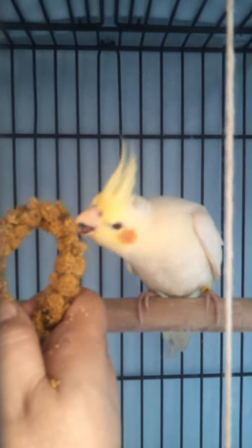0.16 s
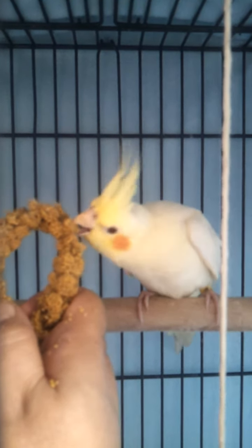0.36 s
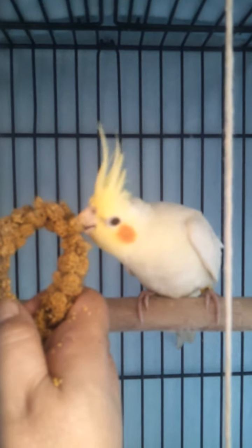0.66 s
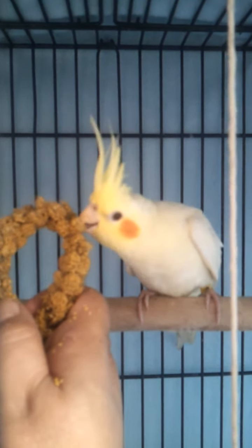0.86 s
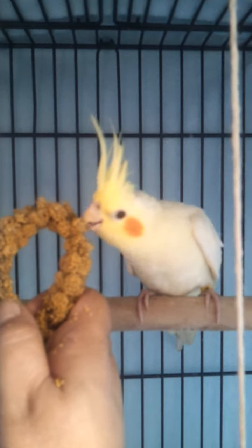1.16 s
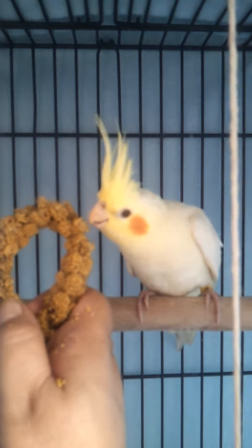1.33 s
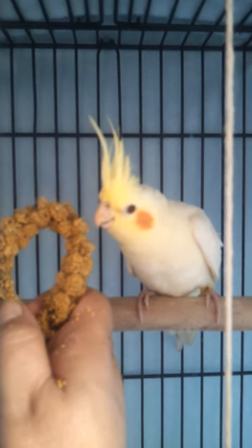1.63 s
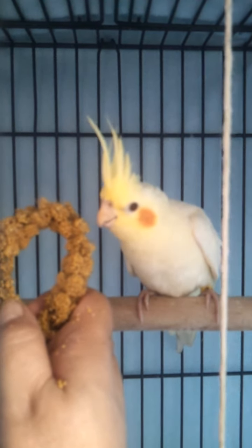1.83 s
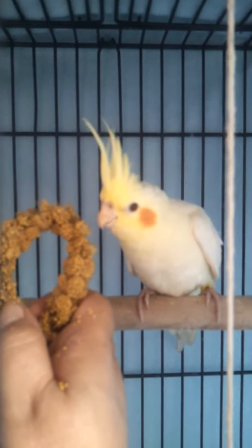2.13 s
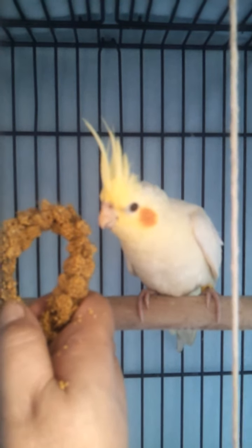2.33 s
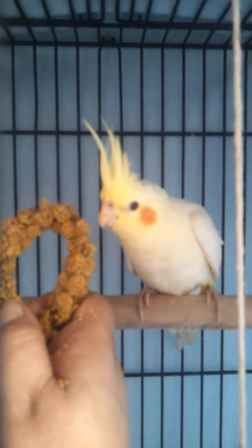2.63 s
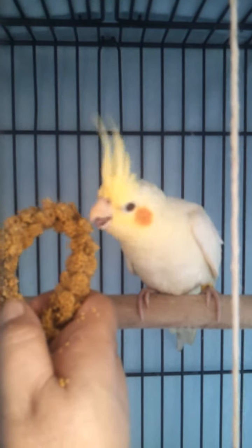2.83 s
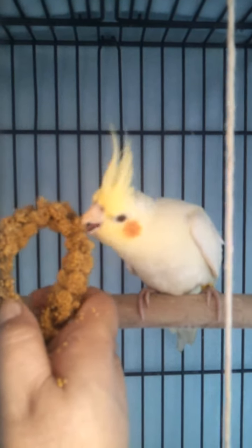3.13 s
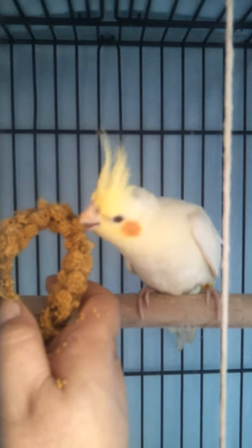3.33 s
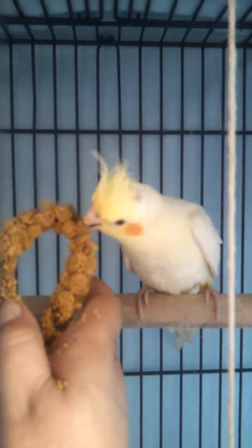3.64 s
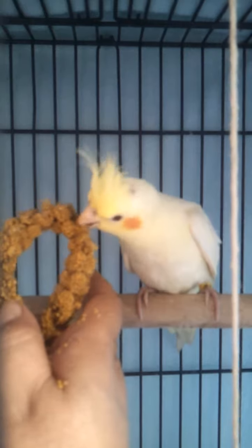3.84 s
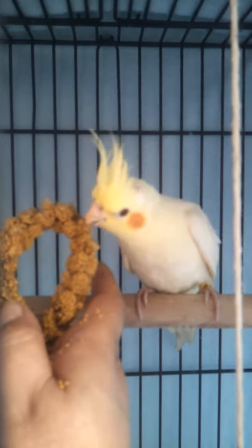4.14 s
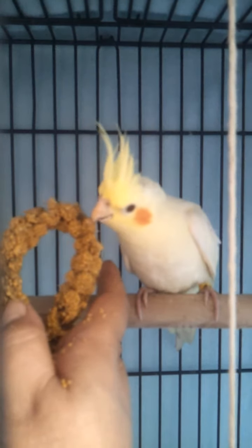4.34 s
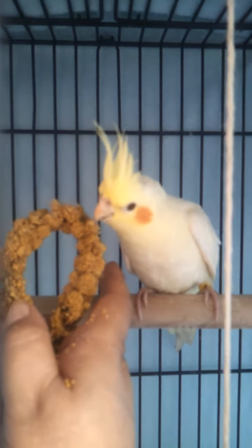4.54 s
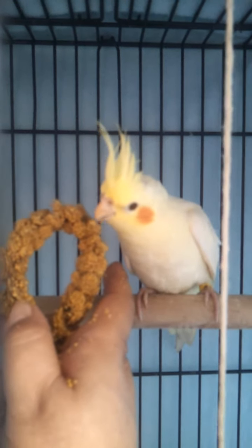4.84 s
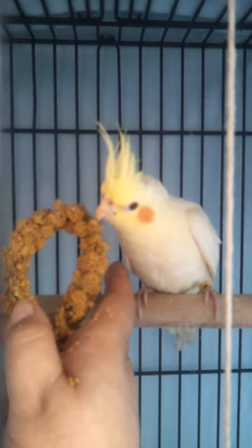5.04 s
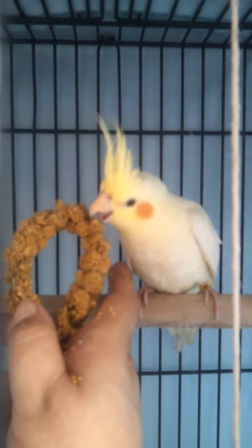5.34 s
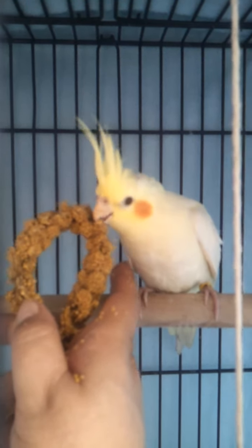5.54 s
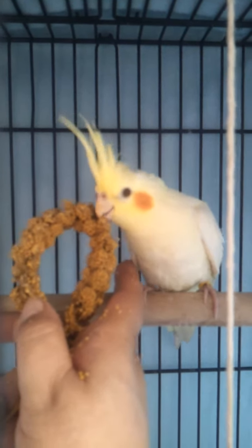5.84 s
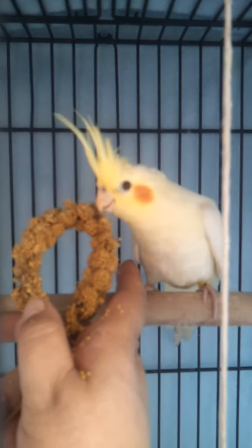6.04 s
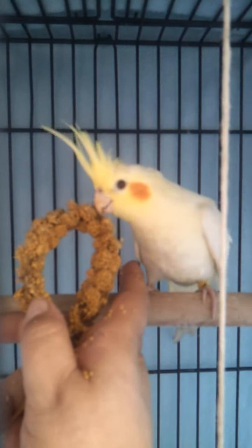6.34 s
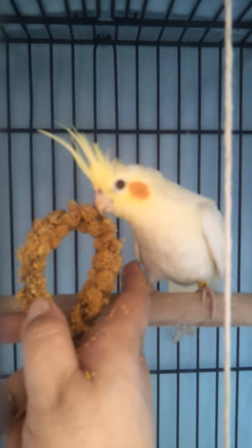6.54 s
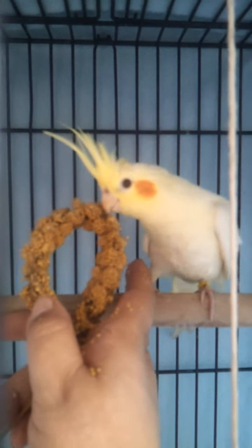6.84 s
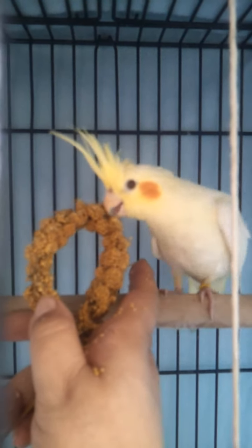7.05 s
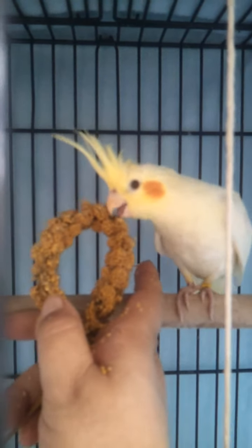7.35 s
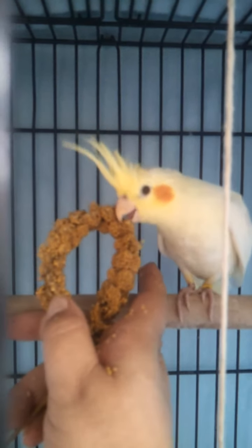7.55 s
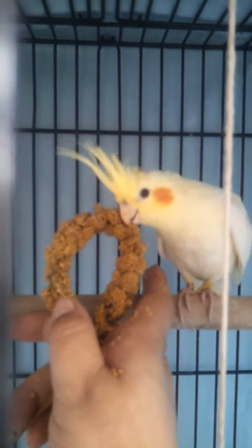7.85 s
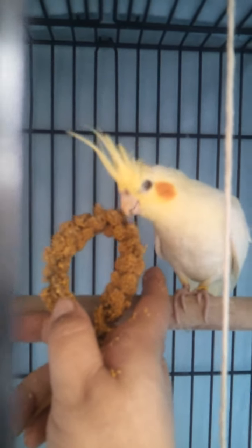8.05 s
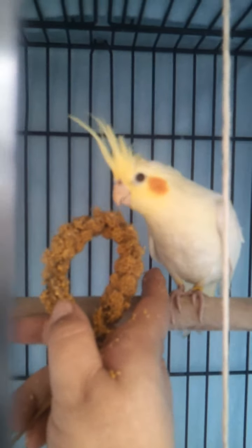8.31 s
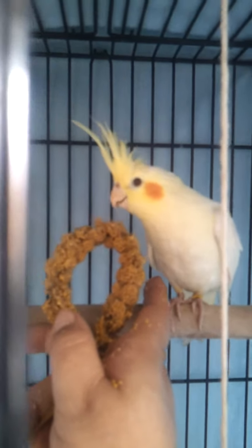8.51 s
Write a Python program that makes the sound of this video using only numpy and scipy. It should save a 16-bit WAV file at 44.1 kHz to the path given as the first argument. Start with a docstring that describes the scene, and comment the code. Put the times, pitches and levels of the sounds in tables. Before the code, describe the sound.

In a quiet small room, close to a phone microphone, a cockatiel nibbles a dry millet spray. Tiny beak ticks and crisp husk cracks come irregularly over soft hiss and low room rumble, with brief papery rustles. A barely audible squeak slips by, seeds click on the cage floor, one of them loud, claws scratch a wire, and a knock sets the cage rattling and ringing at the end.

```python
"""A cockatiel nibbles a hand-held millet spray in a wire cage, close to a phone in a quiet room.
Filtered noise makes the still air, soft rubs and rustling spray; beak touches and husk cracks are pulses
ringing broad resonances. A gliding sine squeaks faintly, then seeds drop on the cage floor as duller or
sharper clicks. Near the end claws scratch a wire, then a knock sets frame and wires ringing as decaying modes.
Decaying noise echoes each click; the phone's processing leaves a soft low rumble after sharp clicks."""
import sys
import numpy as np
from scipy import signal
from scipy.fft import rfft, irfft, next_fast_len
from scipy.io import wavfile

SR = 44100
rng = np.random.default_rng(int(sys.argv[2]) if len(sys.argv) > 2 else 0)


def int16_out(signal):
    """Quantize to a 16-bit WAV file."""
    q = np.round(np.clip(np.atleast_2d(signal).T, -1, 1) * 32767)
    wavfile.write(sys.argv[1], SR, q.astype(np.int16))


N = 382788
TIME = np.arange(N) / SR  # s

# Resonances of a hard contact on the cage: tray or wire, seed or claw, tick.
# Each row: low edge in Hz, high edge in Hz.
CONTACT_BANDS_HZ = [(1950, 4400), (5500, 7800), (8800, 14500)]


def amp(db):
    """Decibels to gain."""
    return 10 ** (np.asarray(db) / 20)


def unit(x):
    """Scale to rms 1."""
    return x / np.sqrt(np.mean(x ** 2))


def sides(pan_db):
    """Left and right gain for a level difference, left minus right."""
    gains = amp(np.array([[pan_db], [-pan_db]]) / 2)
    return unit(gains)


def band(x, low_hz, high_hz, order=2):
    """Causal Butterworth band-pass."""
    sos = signal.butter(order, [low_hz, high_hz], "bandpass", fs=SR, output="sos")
    return signal.sosfilt(sos, x)


def colour(x, points):
    """Shape a spectrum by (Hz, dB) points, joined over log frequency, at rms 1."""
    hz, db = np.transpose(points)
    length = x.shape[-1]
    size = next_fast_len(length)
    bins_hz = np.maximum(np.arange(size // 2 + 1) * SR / size, 1)
    gain = amp(np.interp(np.log(bins_hz), np.log(hz), db))
    shaped = irfft(rfft(x, size) * gain, size)
    return unit(shaped[..., :length])


def fade(t, t60_s):
    """Exponential decay, 60 dB down at t60_s."""
    return np.exp(-np.log(1000) * t / t60_s)


def add(out, start_s, sound):
    """Mix a sound in at a time."""
    i = max(int(start_s * SR), 0)
    out[..., i:i + sound.shape[-1]] += sound[..., :max(N - i, 0)]


def tilted(bands_hz, parts_db, brightness):
    """Part levels of a click: a sharper contact tilts them toward the treble, in dB per octave."""
    octaves = np.log2(bands_hz).mean(axis=1)
    return np.array(parts_db) + brightness * (octaves - octaves.mean())


def click(bands_hz, levels_db, pan_db, lag_s, split_t60_s, split_db, scatter_t60_s, scatter_db):
    """One snap: a pulse and brief splintering ring broad resonances; bars and perch scatter it."""
    t = TIME[:2048]
    pulse = unit(1. * (t == 0))
    splinters = rng.standard_normal(len(t)) * fade(t, split_t60_s)
    scatter = rng.standard_normal((2, len(t))) * fade(t, scatter_t60_s) * (1 - fade(t, 0.0071))
    push = pulse + amp(split_db) * unit(splinters) + amp(scatter_db) * unit(scatter)
    snap = np.zeros((2, len(t)))
    for k, ((low_hz, high_hz), db) in enumerate(zip(bands_hz, levels_db)):
        # alternate signs, so the skirts of neighbouring resonances join without a gap
        snap += (-1) ** k * amp(db) * unit(band(push, low_hz, high_hz))
    snap *= np.sqrt(0.005 / t[-1])  # levels_db: rms if the energy filled 5 ms
    # lag_s > 0 delays the left port, < 0 the right
    delays = [max(round(s * SR), 0) for s in (lag_s, -lag_s)]
    ports = np.array([np.roll(port, delay) for port, delay in zip(snap, delays)])
    return sides(pan_db) * ports


def ring(modes, t, port_spread_rad):
    """Decaying modes (Hz, dB, t60 in s), each reaching the two ports in its own phase."""
    out = np.zeros((2, len(t)))
    for hz, db, t60_s in modes:
        port_phase = port_spread_rad * rng.standard_normal((2, 1))
        tone = np.sin(2 * np.pi * (hz * t + rng.random()) + port_phase)
        out += amp(db) * np.sqrt(2) * fade(t, t60_s) * tone
    return out


def air(level_db=-53.5, hum_db=-75, hum_hz=113):
    """Steady hiss, and a low room rumble that is stronger on the left, with a faint hum."""
    # Still room. Each row: frequency in Hz, relative density in dB per Hz.
    air_points = [(12, -38), (20, -4.5), (55, -3), (113, -1.5), (293, -5.5), (357, -5.5), (388, -6),
                  (678, -9.5), (802, -10.5), (1440, -13), (2020, -14.5), (2910, -15.5), (3530, -15.5),
                  (14700, -20), (16000, -26)]
    noise = colour(rng.standard_normal((2, N)) + 0.24 * rng.standard_normal(N), air_points)
    low = signal.sosfiltfilt(signal.butter(2, 320, fs=SR, output="sos"), noise)
    hum = amp(hum_db) * np.sqrt(2) * np.sin(2 * np.pi * hum_hz * TIME)
    return amp(level_db) * (noise - low + sides(4.3) * low) + hum


def rubs(rise_share=0.16):
    """Soft rubs and shudders: noise in one resonance swells quickly and dies away."""
    # Rubs around the cage. Each row: start in seconds, length in seconds, centre in Hz,
    # width in Hz, level at the peak in dB.
    rub_rows = [(0, 0.084, 6090, 2200, -54.5), (0, 0.11, 2650, 340, -62), (0.459, 0.2, 377, 490, -52.5),
                (0.701, 1.12, 72, 31.7, -64), (6.99, 0.19, 131.6, 18, -53), (7.011, .13, 514, 72, -53),
                (7.24, 0.17, 137.5, 18, -54), (8.072, .12, 450, 1040, -52)]
    out = np.zeros((2, N))
    for start_s, length_s, hz, width_hz, db in rub_rows:
        noise = rng.standard_normal((2, 2 * SR)) + rng.standard_normal(2 * SR)
        low_hz = np.hypot(hz, width_hz / 2) - width_hz / 2
        progress = TIME[:int(length_s * SR)] / length_s
        swell = np.interp(progress, [0, rise_share, 1], [0, 1, 0]) ** 0.67
        settled = band(noise, low_hz, low_hz + width_hz)[:, -len(swell):]
        add(out, start_s, amp(db) * unit(settled) * swell)
    return out


def tugging(rise_share=0.48, held_db=-64):
    """Rustle strength: every tug swells and dies away over the faint stir of the held spray."""
    # Tugs at the spray. Each row: peak time in seconds, length in seconds, level at the peak in dB.
    tugs = [(.02, .1, -60), (.38, 0.15, -53), (0.683, 0.086, -54), (.89, 0.083, -57), (1.067, 0.072, -60.5),
            (2.887, 0.11, -57), (3.14, 0.047, -46), (3.32, .14, -58.5), (3.526, 0.19, -54.5),
            (3.773, .12, -54), (4.0, .25, -58), (5.475, 0.1, -56.5), (5.704, 0.14, -59), (7.36, .25, -56),
            (7.633, 0.26, -54)]
    power = amp(held_db) ** 2
    for peak_s, length_s, db in tugs:
        reach_s = length_s * np.where(TIME < peak_s, rise_share, 1 - rise_share)
        power = power + amp(db) ** 2 * np.exp(-((TIME - peak_s) / reach_s) ** 2)
    return np.sqrt(power)


def spray(spread_db=4.5, grains_per_s=3500, pan_db=-1.5):
    """Dense tiny husk grains, a few of them standing out."""
    # Colour of dry husks. Each row: frequency in Hz, level in dB.
    husk_points = [(800, -32), (2500, -13), (5000, -0.5), (7600, 2.5), (10500, 0.5), (15000, -5)]
    hit = rng.random(N) < grains_per_s / SR
    size = amp(spread_db * np.minimum(rng.exponential(size=N), 3))
    grains = colour(hit * size * rng.standard_normal((2, N)), husk_points)
    return grains * sides(pan_db) * tugging()


def beak(touch_parts_db=(-20.3, -11.3, -3.3, -5.3), average_crack_db=-47):
    """Light touches are mostly snap and tick, with little hollow beak; husks crack, earlier on the right."""
    # Light touches on the spray. Each row: start in seconds, level in dB.
    touches = [(0.1124, -48.5), (0.1862, -51), (0.3275, -45.5), (0.3888, -48), (0.651, -47.7), (2.363, -49),
               (2.6843, -50), (3.0037, -50), (3.1232, -51), (3.308, -47.5), (3.566, -53), (3.9573, -49),
               (3.982, -49)]
    # Husks cracking. Each row: start in seconds, level in dB, brightness in dB per octave.
    husk_cracks = [(0.919, -52, -2.3), (1.3879, -37, -1), (1.4916, -56.5, -1.5), (1.823, -53.5, -2.5),
                   (2.0723, -41.5, -2), (3.3653, -51, 2.5), (3.8113, -51, 4), (4.0974, -55, -0.5),
                   (4.184, -57, -3.5), (4.4621, -31, -0.5), (4.9835, -48, -3), (5.665, -44, -1.5),
                   (5.8084, -57, -4.5), (5.986, -47, 2), (5.9912, -52, 6.5), (6.0475, -33.5, 4),
                   (6.3426, -47, 1.5), (7.7019, -55.5, 2.7), (7.8007, -48, -1), (8.0112, -48, 7),
                   (8.0232, -39, 7.5), (8.0302, -36.5, 3.5), (8.2323, -53, 0.5)]
    # Hollow beak, shell, snap, tick. Each row: low edge in Hz, high edge in Hz.
    crack_bands_hz = [(1040, 1600), (2200, 5300), (6200, 8300), (10900, 15000)]
    # Average crack. One level in dB per part, in the same order.
    crack_parts_db = (-2, -0.5, -1, 3)
    # A harder bite makes the shell give way more. One growth per part, in dB per dB above average.
    crack_growth = (0, 0.18, 0.063, 0)
    out = np.zeros((2, N))
    for start_s, db in touches:
        parts_db = db + np.array(touch_parts_db)
        add(out, start_s, click(crack_bands_hz, parts_db, pan_db=-2.5, lag_s=0.000105,
                                split_t60_s=0.0042, split_db=-7, scatter_t60_s=0.023, scatter_db=4))
    for start_s, db, brightness in husk_cracks:
        parts_db = db + tilted(crack_bands_hz, crack_parts_db, brightness)
        parts_db = parts_db + np.array(crack_growth) * (db - average_crack_db)
        add(out, start_s, click(crack_bands_hz, parts_db, pan_db=0, lag_s=0.000125,
                                split_t60_s=0.0016, split_db=-6.5, scatter_t60_s=0.013, scatter_db=-3))
    return band(out, 900, 21000, order=3)


def room(x, t60_s=0.35, build_up_s=0.0027):
    """Diffuse echo of a small furnished room: decaying noise, different at each port."""
    # Colour of the echo. Each row: frequency in Hz, level in dB.
    echo_points = [(200, -14), (1400, 4), (3500, 4.5), (6500, 4), (9000, 5), (12000, -4.5), (15500, 1.5)]
    t = TIME[:SR // 2]
    tail = colour(rng.standard_normal((2, len(t))), echo_points)
    tail = tail * fade(t, t60_s) * np.minimum(t / build_up_s, 1)
    return signal.fftconvolve(x, unit(tail) / np.sqrt(len(t)), axes=1)[:, :N]


def phone_rumble(clicks, rumble_db=-16.5, rumble_t60_s=0.34):
    """The phone's processing leaves low noise after sharp clicks, following their smeared treble power."""
    t = TIME[:SR]
    trail = fade(t, rumble_t60_s) ** 2 * (1 - fade(t, 0.046))
    treble = band(clicks, 8500, 16000)
    power = signal.fftconvolve(np.mean(treble ** 2, axis=0), trail / trail.sum())[:N]
    low_noise = unit(band(rng.standard_normal(N), 18, 80))
    return amp(rumble_db) * np.sqrt(np.abs(power)) * low_noise


def squeak(peak_db=-54, echo_share=0.66):
    """A faint, distant tone dips, then breaks upward; its power is split between direct and room sound."""
    # Pitch of the squeak. Each row: time in seconds, frequency in Hz.
    glide = [(2.46, 1960), (2.515, 2030), (2.548, 1760), (2.572, 1960), (2.578, 2460), (2.61, 2550)]
    times_s, hz = np.transpose(glide)
    progress = np.clip((TIME - times_s[0]) / (times_s[-1] - times_s[0]), 0, 1)
    swell = np.sin(np.pi * progress)
    phase = 2 * np.pi * np.cumsum(np.interp(TIME, times_s, hz)) / SR
    tone = amp(peak_db) * sides(0) * swell * np.sin(phase)
    return np.sqrt(1 - echo_share) * tone + np.sqrt(echo_share) * room(tone)


def seeds(pan_db=3.5):
    """Seeds strike the floor tray to the left, farther off, with more scatter."""
    # Seeds landing or bouncing. Each row: start in seconds, level in dB, brightness in dB per octave.
    landings = [(2.8405, -42.5, 7), (3.7102, -42, 8.5), (4.7078, -29.5, -3), (4.799, -46, -3),
                (7.147, -19, -0.5), (7.2427, -42, 4), (7.3071, -42.5, -1), (7.313, -42, 0),
                (7.3534, -40.5, -5.5), (7.3752, -48.5, -9), (7.4282, -44, 2), (7.513, -45.5, 0),
                (7.574, -49.5, -2.5)]
    # Average landing. One level in dB each for tray, seed and tick.
    drop_parts_db = (-8.5, 0, -10.5)
    out = np.zeros((2, N))
    for start_s, db, brightness in landings:
        parts_db = db + tilted(CONTACT_BANDS_HZ, drop_parts_db, brightness)
        add(out, start_s, click(CONTACT_BANDS_HZ, parts_db, pan_db, lag_s=-0.000385,
                                split_t60_s=0.011, split_db=7, scatter_t60_s=0.021, scatter_db=7))
    return band(out, 1600, 21000, order=6)


def claws(parts_db=(-5, 0, -13), ring_db=-16, ring_hz=6030, ring_t60_s=0.38):
    """A claw stutters along a wire as the bird shifts its foot, and leaves it ringing."""
    # Claw scratches. Each row: start in seconds, level in dB.
    scratches = [(7.007, -47), (7.0195, -43), (7.027, -44.5), (7.051, -47.5)]
    out = np.zeros((2, N))
    for start_s, db in scratches:
        add(out, start_s, click(CONTACT_BANDS_HZ, db + np.array(parts_db), pan_db=1, lag_s=-0.00023,
                                split_t60_s=0.03, split_db=4, scatter_t60_s=0.043, scatter_db=9))
        wire_hz = ring_hz * (1 + 0.011 * rng.standard_normal())
        add(out, start_s, ring([(wire_hz, db + ring_db, ring_t60_s)], TIME[:SR], port_spread_rad=0.6))
    return band(out, 1600, 21000)


def wires(t, count=3, detune=0.0045):
    """Each pitch is shared by a few almost equal wires, which beat against each other."""
    # Ringing of the wires. Each row: frequency in Hz, level in dB, t60 in seconds.
    wire_modes = [(2180, -18, 0.41), (5780, -18.5, 0.39), (6060, -16, 0.47), (6660, -18, 0.44),
                  (8760, -19, 0.41), (8909, -8, 0.26), (10800, -6, 0.17)]
    modes = []
    for hz, db, t60_s in wire_modes:
        for _ in range(count):
            modes.append((hz * (1 + detune * rng.standard_normal()), db, t60_s))
    return ring(modes, t, port_spread_rad=1) / np.sqrt(count)


def cage(thud_t60_s=0.65, thud_delay_s=0.008, thud_rise_s=0.022, rattle_t60_s=0.26, rattle_rise_s=0.0024):
    """The wires rattle at once; the heavier frame builds up later and rings longer."""
    # Knocks on the cage. Each row: start in seconds, frame thud in dB, wire rattle in dB.
    knocks = [(8.395, -37, -29.5)]
    # Colour of the frame's thud. Each row: frequency in Hz, level in dB.
    thud_points = [(62, -4), (155, 0), (280, -2.5), (530, -3.5), (920, -5.5), (1520, -14), (3100, -17.5),
                   (6100, -37)]
    # Colour of the wires' rattle. Each row: frequency in Hz, level in dB.
    rattle_points = [(1250, -8.5), (2150, -8.5), (3350, -9), (4400, -5), (6100, .5), (8700, 4.5),
                     (9950, -7), (11100, -1.5), (13100, -2), (15400, -14.5)]
    # Ringing of the frame. Each row: frequency in Hz, level in dB, t60 in seconds.
    frame_modes = [(160, -4, 0.88), (190, -16, 0.97), (231.4, -7, 0.65), (325.6, -8.5, 0.63),
                   (452, -10.5, 0.56), (662, -15, 0.71)]
    out, t = np.zeros((2, N)), TIME[:SR]
    for start_s, thud_db, rattle_db in knocks:
        thud_noise = rng.standard_normal((2, SR)) + 0.91 * rng.standard_normal(SR)
        thud = colour(thud_noise, thud_points) * fade(t, thud_t60_s)
        thud = (thud + ring(frame_modes, t, port_spread_rad=0.35)) * np.minimum(t / thud_rise_s, 1)
        rattle = colour(rng.standard_normal((2, SR)), rattle_points) * fade(t, rattle_t60_s)
        rattle = (rattle + wires(t)) * np.minimum(t / rattle_rise_s, 1)
        add(out, start_s + thud_delay_s, amp(thud_db) * sides(3.2) * thud)
        add(out, start_s, amp(rattle_db) * sides(-0.83) * rattle)
    return out


def scene(beak_room_db=-9.0, seed_room_db=-8.5):
    """The beak is near and dry; the cage floor is heard slightly more through the room."""
    near = spray() + beak()
    far = seeds() + claws()
    echo = room(amp(beak_room_db) * near + amp(seed_room_db) * far)
    return air() + rubs() + near + far + echo + phone_rumble(near + far) + squeak() + cage()


def record(dry, top_hz=15900):
    """The phone cuts the top of the treble with a steep elliptic low-pass."""
    return signal.sosfilt(signal.ellip(8, 0.2, 70, top_hz, fs=SR, output="sos"), dry)


dry = scene()
out = record(dry)
int16_out(out)
```